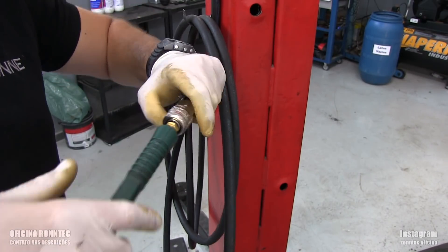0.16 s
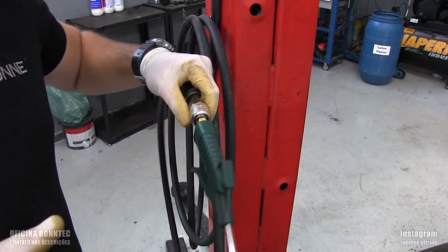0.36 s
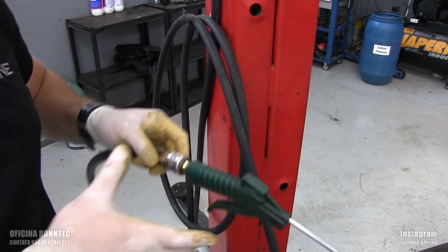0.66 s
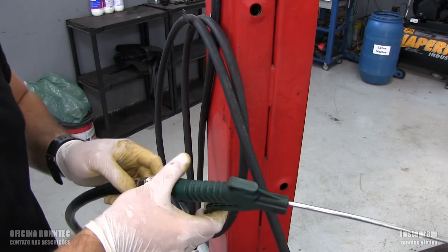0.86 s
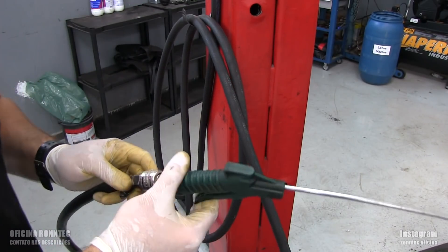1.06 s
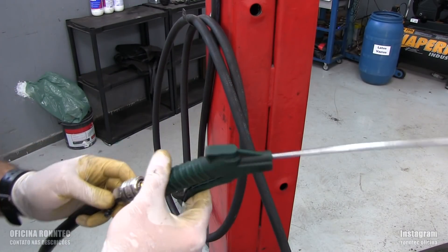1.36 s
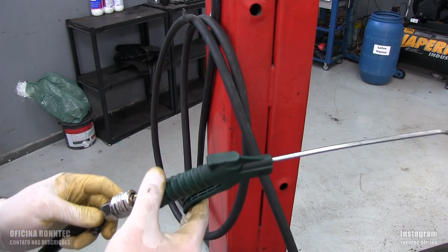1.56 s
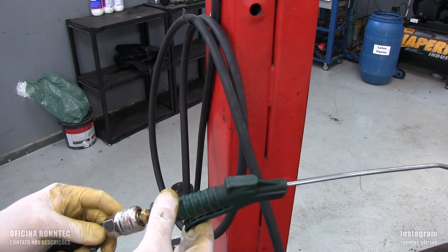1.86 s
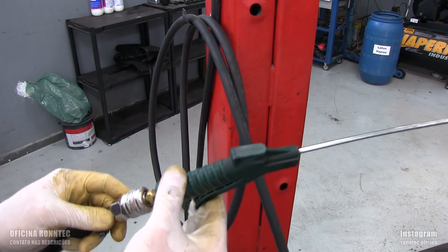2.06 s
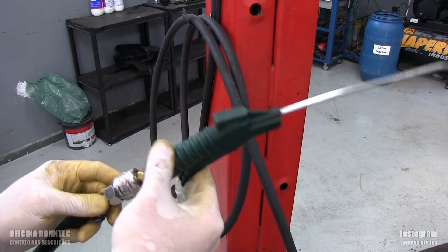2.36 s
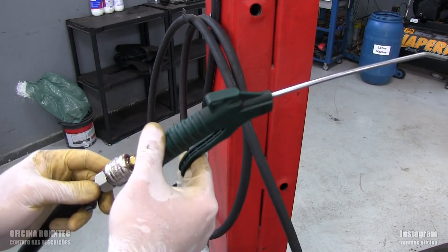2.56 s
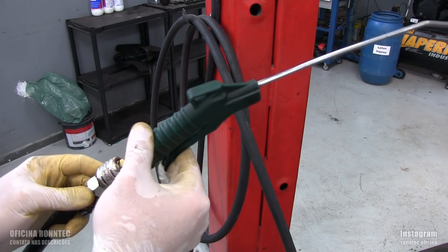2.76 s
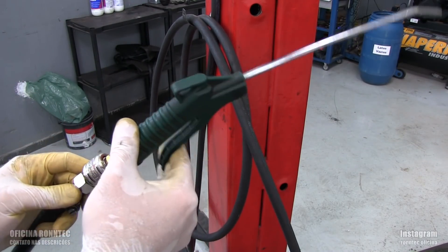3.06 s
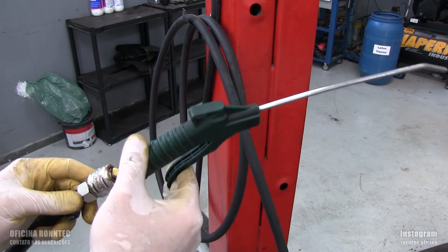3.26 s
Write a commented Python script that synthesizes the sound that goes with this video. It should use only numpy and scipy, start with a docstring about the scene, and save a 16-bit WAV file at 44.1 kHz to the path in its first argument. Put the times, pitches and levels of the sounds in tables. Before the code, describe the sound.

Air blow gun in a hard, echoing workshop, heard close: small metal ticks and a faint rubbery squeak, then four short air blasts and one longer one, reverberation swelling up between them.

```python
"""In a workshop, an air gun is fitted to its hose coupler with light metal clicks, then fired five times.
Each squeeze shapes a bright turbulent hiss and a short duller chuff; low valve thumps punctuate them.
A decaying noise tail makes the hall ring on. Filtered noise makes the hose rub and squeak, gliding
tones make it groan, and low hum, rumble and a fading hiss lie underneath.
A gain control ducks each blast and swells the reverberation between them."""
import sys
import numpy as np
from scipy import signal
from scipy.fft import rfft, irfft
from scipy.io import wavfile
from scipy.ndimage import uniform_filter1d

SR = 44100
rng = np.random.default_rng(int(sys.argv[2]) if len(sys.argv) > 2 else 0)


def master_out(mix):
    """Clip the mix to full scale and print it as 16-bit PCM to the path in sys.argv[1]."""
    frames = np.transpose(np.atleast_2d(mix))
    ceiling = np.clip(frames, -1, 1)
    pcm = np.round(ceiling * 32767).astype(np.int16)
    wavfile.write(sys.argv[1], SR, pcm)


N = 149940  # 3.4 s

NEAR_LIKENESS, NEAR_PAN_DB = 0.8, -2.5  # default stereo image: likeness 0-1, left minus right
TILT_PIVOT_HZ, HUMP_OCTAVES = 6000, 0.093  # where a tilt is neutral; width of a spectral hump


def amp(db):
    """Turns decibels into gain."""
    return 10 ** (np.asarray(db) / 20)


def unit(x):
    """Scales a signal to rms 1."""
    return x / np.sqrt(np.mean(x ** 2) + 1e-20)


def read(table, hz, axis=1):
    """Reads one column of a table, joined on a log-frequency axis."""
    columns = np.transpose(table)
    return np.interp(np.log(hz + 1), np.log(columns[0] + 1), columns[axis])


def level(curve, axis=1):
    """Draws a gain over time from a dB column of a curve."""
    columns = np.transpose(curve)
    return amp(np.interp(np.arange(N) / SR, columns[0], columns[axis]))


def add(mix, start_s, sound):
    """Mixes a sound in at its start time."""
    part = mix[:, max(round(start_s * SR), 0):][:, :sound.shape[-1]]
    part += sound[..., :part.shape[1]]


def pair(z, likeness, pan_db):
    """Blends two unrelated signals into a partly alike, panned stereo pair."""
    likeness = np.clip(likeness, 0, 1)
    mid = np.sqrt((1 + likeness) / 2) * z[0]
    side = np.sqrt((1 - likeness) / 2) * z[1]
    return np.array([(mid + side) * amp(pan_db / 2), (mid - side) * amp(-pan_db / 2)])


def stereo_noise(gain, likeness, pan_db, size):
    """Shapes white noise by a gain over frequency into a stereo pair of rms 1."""
    spectra = rfft(rng.standard_normal((2, size)))
    return unit(irfft(pair(spectra, likeness, pan_db) * gain, size))


def noise(spectrum, tilt_db=0, stereo=None, hump_hz=1000, hump_db=0, size=N):
    """Colours stereo noise of rms 1 with a spectrum, a tilt and one hump."""
    hz = np.fft.rfftfreq(size, 1 / SR)
    hump = hump_db * np.exp(-.5 * (np.log2((hz + 1) / hump_hz) / HUMP_OCTAVES) ** 2)
    tilt = tilt_db * np.log2(np.maximum(hz, 500) / TILT_PIVOT_HZ)
    likeness, pan_db = NEAR_LIKENESS, NEAR_PAN_DB
    if stereo is not None:
        likeness, pan_db = read(stereo, hz), read(stereo, hz, axis=2)
    return stereo_noise(amp(read(spectrum, hz) + hump + tilt), likeness, pan_db, size)


def resonances(rings):
    """Makes stereo noise of rms 1 ring in narrow resonances."""
    hz = np.fft.rfftfreq(N, 1 / SR)
    gain = sum(amp(db) / (1 + (2 * (hz - ring_hz) / width_hz) ** 2) for ring_hz, width_hz, db in rings)
    return stereo_noise(gain, NEAR_LIKENESS, NEAR_PAN_DB, N)


def waver(hz, size=N):
    """Makes random motion of rms 1, mostly slower than the given rate."""
    smoothing = 1 + (np.fft.rfftfreq(size, 1 / SR) / hz) ** 2
    return unit(irfft(rfft(rng.standard_normal(size)) / smoothing, size))


def ramp(u):
    """Steps smoothly from 0 to 1."""
    return np.sin(np.pi / 2 * np.clip(u, 0, 1)) ** 2


# Trigger squeezes: start_s, length_s (start to onset of closing), opening_s, closing_s, level_db,
# treble_tilt_db_per_octave, hump_hz, hump_db
SQUEEZES = [(1.101, 0.05, 0.038, 0.09, -1, 0.5, 11700, 2.5),
            (1.327, 0.098, 0.051, 0.047, 0, 0.5, 11500, -1.5), (1.961, .115, 0.069, 0.067, 4.5, 0, 5790, 1),
            (2.325, 0.1394, 0.083, 0.058, 7.5, -0.5, 12900, 0.5),
            (2.667, 0.38, .055, 0.074, 2, 0.28, 5980, 2)]
# Jet colour: frequency_hz, relative_density_db
JET_SPECTRUM = [(100, -38), (400, -24), (1000, -16.5), (2500, -11.5), (5000, -7), (8500, -4), (11500, -0.5),
                (14000, -1), (16000, -8.5)]
# Stereo image of jet and clicks: frequency_hz, likeness_0_to_1, left_minus_right_db
JET_IMAGE = [(500, 1, -6), (3000, .75, -3.5), (7000, 0.65, -2), (12000, 0.92, -0.5)]
# Duller chuff while the valve is only part open: frequency_hz, relative_density_db
CHUFF_SPECTRUM = [(150, -11.5), (600, -4), (1400, -0.5), (3000, 0.5), (5700, 0), (9000, -6), (16000, -13)]
CHUFF_DB, CHUFF_DECAY_S = -9.5, 0.085  # level against the hiss; time constant
DRIFT_DB_PER_S, VALVE_POWER = 2, 1.21  # rise of the hiss in a blast; valve opening to loudness


def jet():
    """Turbulent hiss follows the valve opening; each blast starts with a duller chuff."""
    out, t = np.zeros((2, N)), np.arange(SR) / SR
    for start_s, length_s, opening_s, closing_s, db, tilt_db, hump_hz, hump_db in SQUEEZES:
        valve = ramp(t / opening_s) * (1 - ramp((t - length_s) / closing_s))
        hiss = noise(JET_SPECTRUM, tilt_db, JET_IMAGE, hump_hz, hump_db, size=SR)
        hiss = hiss * amp(DRIFT_DB_PER_S * t)
        chuff = noise(CHUFF_SPECTRUM, stereo=JET_IMAGE, size=SR)
        chuff = chuff * amp(CHUFF_DB) * np.exp(-t / CHUFF_DECAY_S)
        add(out, start_s, valve ** VALVE_POWER * amp(db) * (hiss + chuff))
    return out


# Valve and trigger thumps: start_s, level_db
THUMP_HITS = [(1.1, -19.5), (1.22, -38), (1.325, -22.5), (1.468, -21), (1.973, -23), (2.353, -19),
              (2.665, -18)]
# Thump colour: frequency_hz, relative_density_db
THUMP_SPECTRUM = [(30, -59), (70, -14), (120, -5), (270, -8), (500, -20), (1200, -21), (5000, -28.5)]
THUMP_RISE_S, THUMP_DECAY_S = 0.002, 0.0084


def thumps():
    """Low knocks as the valve opens or shuts: noise bursts that rise and die quickly."""
    out, t = np.zeros((2, N)), np.arange(8192) / SR
    envelope = ramp(t / THUMP_RISE_S) * np.exp(-t / THUMP_DECAY_S)
    for start_s, db in THUMP_HITS:
        add(out, start_s, amp(db) * envelope * noise(THUMP_SPECTRUM, size=len(t)))
    return out


# Coupler clicks: start_s, level_db, treble_tilt_db_per_octave, hump_hz, hump_db
CLICK_HITS = [(0.0204, -23.5, -7, 5500, 12), (.031, -33, -2, 5600, 9), (0.0426, -24.5, -7, 3020, 8),
              (.081, -35, -7, 5000, 3), (0.139, -33, -5, 14000, 8), (.246, -42, 3, 14000, 10),
              (.5112, -37, -6, 8100, 4), (0.615, -44, 4, 6000, 3), (0.637, -32.5, 5, 13400, 15),
              (.644, -37, 5, 7500, 8), (.6863, -41, -11, 4200, 6), (0.818, -38, 5, 13000, 6)]
# Click colour: frequency_hz, relative_density_db
CLICK_SPECTRUM = [(500, -18), (2000, -6), (3100, 3.5), (4200, 4.5), (5600, 5.5), (7500, 9), (10000, -3),
                  (13000, -2), (16000, -10)]
# Ring of the coupler: frequency_hz, level_db (against the click level), t60_s
COUPLER_RING = [(2180, -29, 0.26), (3090, -27, .15), (4820, -33, .15), (5350, -22, 0.053),
                (7300, -23, 0.11)]
CLICK_DECAY_S = 0.0012


def clicks():
    """The plug ticks against the coupler: a tiny noise burst and a few decaying modes."""
    out, t = np.zeros((2, N)), np.arange(8192) / SR
    ring = sum(amp(db - 60 * t / t60_s) * np.sin(2 * np.pi * hz * t) for hz, db, t60_s in COUPLER_RING)
    for start_s, db, tilt_db, hump_hz, hump_db in CLICK_HITS:
        tick = noise(CLICK_SPECTRUM, tilt_db, JET_IMAGE, hump_hz, hump_db, size=len(t))
        add(out, start_s, amp(db) * (np.exp(-t / CLICK_DECAY_S) * tick + ring))
    return out


# Hose sliding and handling: time_s, level_db
RUB_LEVEL = [(0, -45), (.16, -43), (.2, -34), (.36, -39), (.42, -40), (.65, -42), (.83, -43.5),
             (1.0, -38.5), (1.1, -36.5), (1.25, -37), (3.4, -39)]
# Rubbing colour: frequency_hz, relative_density_db
RUB_SPECTRUM = [(40, -20), (130, -2), (240, 1), (480, -2), (800, -6), (1500, -12.5), (3000, -23.5),
                (8000, -33), (16000, -43)]


def rubbing():
    """Hose and gloves rub: mostly low noise that follows a level curve."""
    return noise(RUB_SPECTRUM) * level(RUB_LEVEL)


# Thin squeak of the turning hose: time_s, level_db
SQUEAK_LEVEL = [(0, -68), (.16, -53), (.21, -46), (.4, -52), (.55, -57), (1.1, -69), (3.4, -85)]
# Squeak resonances: frequency_hz, width_hz, relative_level_db
SQUEAK_MODES = [(1108, 67, 5), (3650, 200, -3.5), (3970, 80, -5), (8700, 270, -21.5)]


def squeak():
    """The turning hose squeaks: noise rings in narrow resonances."""
    return resonances(SQUEAK_MODES) * level(SQUEAK_LEVEL)


# Rubbery groans of hose and glove: start_s, length_s, first_pitch_hz, last_pitch_hz, level_db
GROAN_SLIDES = [(0.181, .2, 291.4, 237, -38), (.99, 0.082, 538, 510, -39)]
GROAN_EDGE_S, OVERTONE_DB = 0.015, -20  # fade at each end; octave against the fundamental
GROAN_JITTER, GROAN_BEND = 0.024, 4.1  # rms share of the pitch; exponent, so most of the fall comes late


def groans():
    """Hose and gloves catch twice: a rough tone and its octave sink in pitch."""
    out, t = np.zeros((2, N)), np.arange(SR) / SR
    for start_s, length_s, first_hz, last_hz, db in GROAN_SLIDES:
        hz = first_hz + (last_hz - first_hz) * np.minimum(t / length_s, 1) ** GROAN_BEND
        phase = 2 * np.pi * np.cumsum(hz * (1 + GROAN_JITTER * waver(100, size=SR))) / SR
        tone = unit(np.sin(phase) + amp(OVERTONE_DB) * np.sin(2 * phase))
        tone = tone * amp(db + 2.5 * waver(71, size=SR))
        tone = tone * ramp(t / GROAN_EDGE_S) * ramp((length_s - t) / GROAN_EDGE_S)
        add(out, start_s, pair([tone, tone], 1, NEAR_PAN_DB))
    return out


# Hall reverberation: frequency_hz, t60_s, relative_level_db, likeness_0_to_1
HALL_BANDS = [(200, 3.6, -15.5, 0.7), (940, 3.2, -5.5, 0.72), (2310, 3.55, -1, 0.58), (4860, 2.23, 0, 0.5),
              (8360, 1.254, 0.5, 0.7), (12000, 0.84, -5, 0.77), (16000, 0.44, -3.5, 0.83)]
HALL_DELAY_S, HALL_BUILD_S, HALL_PAN_DB = 0.0046, 0.0067, -1.05


def hall_tail():
    """Random echoes die away band by band, the treble first."""
    hz, t, z = signal.stft(rng.standard_normal((2, 2 * SR)), SR, nperseg=256)
    t60, db, likeness = (read(HALL_BANDS, hz, axis=k)[:, None] for k in (1, 2, 3))
    decay = np.exp(-np.log(1000) * t / t60)
    even_energy = np.sqrt(2 * np.log(1000) / t60 / SR)  # long tails get no louder than short ones
    z = pair(z, likeness, HALL_PAN_DB) * amp(db) * decay * even_energy
    tail = signal.istft(z, SR, nperseg=256)[1]
    return tail * ramp((np.arange(tail.shape[1]) / SR - HALL_DELAY_S) / HALL_BUILD_S)


HALL_DRIFT_HZ = 9  # full rounds of the echo sets per second


def hall(x, count=10):
    """The sound crossfades round a cycle of echo sets."""
    turn = np.arange(N) / SR * HALL_DRIFT_HZ * count
    out = np.zeros((2, N))
    for k in range(count):
        share = np.sqrt(ramp(1 - abs((turn - k) % count - 1)))  # equal-power crossfade
        out += signal.fftconvolve((x.mean(0) * share)[None], hall_tail(), axes=1)[:, :N]
    return out


# Low hum lines of the workshop: frequency_hz, width_hz
HUM_TONES = [(63, 19.7), (112, 13)]
# Hum swells: time_s, lower_line_db, upper_line_db
HUM_LEVEL = [(0, -47.5, -66), (.7, -55, -54), (.95, -53, -57), (1.7, -45, -53.5), (2.3, -53, -41),
             (2.7, -53, -43.5), (3.0, -60, -55.5), (3.4, -65, -46)]


def hum():
    """Two low lines swell and fade, each a narrow noise band plus a wavering sine."""
    out, pan = np.zeros((2, N)), amp([[NEAR_PAN_DB / 2], [-NEAR_PAN_DB / 2]])
    for k, (hz, width_hz) in enumerate(HUM_TONES):
        rough = resonances([(hz, width_hz, 0)])
        sine = np.sin(2 * np.pi * np.cumsum(hz + width_hz / 4 * waver(16)) / SR)
        out += level(HUM_LEVEL, axis=k + 1) * (rough + sine * pan)
    return out


# Workshop rumble colour: frequency_hz, relative_density_db
RUMBLE_SPECTRUM = [(20, -17), (40, -15), (60, -3), (110, -5), (180, -0.5), (300, 0.5), (700, -6.5),
                   (1500, -21), (4000, -27), (9000, -30.5), (16000, -39)]
# Hiss dying away in the hall at the start: frequency_hz, relative_density_db
HISS_SPECTRUM = [(300, -5), (1500, 2), (4000, -1.5), (8000, -9.5), (11000, -14), (16000, -26)]
RUMBLE_DB, HISS_DB, HISS_FADE_DB_PER_S = -43, -42, 17  # the hiss level is where it starts


def background():
    """Steady low-weighted noise is the workshop rumble; a wider hiss fades over it."""
    rumble = amp(RUMBLE_DB) * noise(RUMBLE_SPECTRUM)
    fade = amp(HISS_DB - HISS_FADE_DB_PER_S * np.arange(N) / SR)
    return rumble + fade * noise(HISS_SPECTRUM, stereo=[(1000, 0.44, 0)])


CLICK_WET_DB = -15  # clicks sent to the hall


def scene():
    """Sets gun, hose and workshop together, with gun and coupler feeding the hall."""
    air, ticks, knocks = jet(), clicks(), thumps()
    echoes = hall(air + knocks + amp(CLICK_WET_DB) * ticks)
    handling = rubbing() + squeak() + groans()
    return air + ticks + knocks + echoes + handling + hum() + background()


LIMIT_DB, SLOPE = -10.5, 0.96  # threshold; dB of cut wanted per dB above it
ATTACK_S, RECOVER_DB_PER_S = 0.0023, 63
MEMORY_S, SLOW_CUT_SHARE = .8, 0.22  # memory time constant; share of it added to the cut


def gain_control(x, size=64):
    """Ducks quickly and recovers, but only as far as a slowly charged memory of the cut allows."""
    step_s = size / SR
    power = uniform_filter1d((x ** 2).mean(0), size=2 * size)[::size]
    over_db = np.maximum(10 * np.log10(abs(power) + 1e-12) - LIMIT_DB, 0)
    cut, memory, cuts = 0, 0, []
    for want in SLOPE * over_db:
        if want > cut:
            cut += (want - cut) * (1 - np.exp(-step_s / ATTACK_S))
        else:
            cut = max(cut - RECOVER_DB_PER_S * step_s, want, min(cut, memory))
        memory += (cut - memory) * step_s / MEMORY_S
        cuts.append(cut + SLOW_CUT_SHARE * memory)
    return x * amp(-np.interp(np.arange(N), np.arange(len(cuts)) * size, cuts))


CUTOFF_HZ = 16080


def record(dry):
    """Applies gain control, hard clipping and a steep treble limit."""
    loud = np.clip(gain_control(dry), -1, 1)
    low_pass = signal.firwin(401, CUTOFF_HZ, window=("kaiser", 8), fs=SR)
    return signal.oaconvolve(loud, low_pass[None], "same")


dry = scene()
out = record(dry)
master_out(out)
```